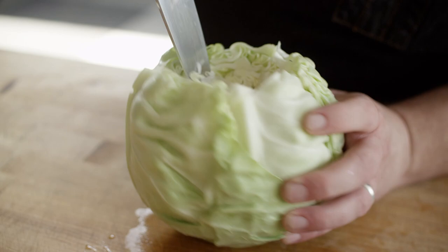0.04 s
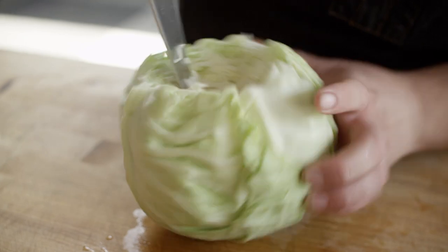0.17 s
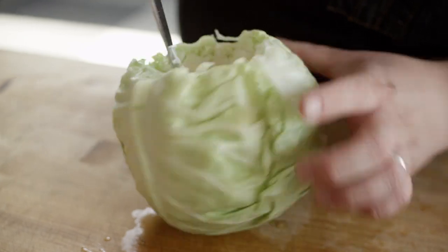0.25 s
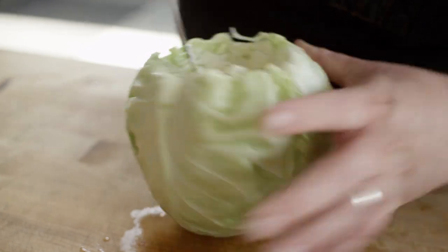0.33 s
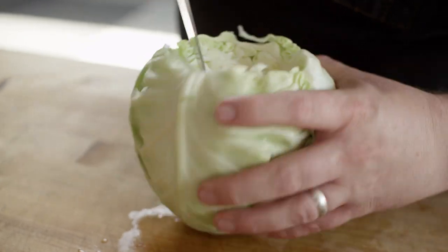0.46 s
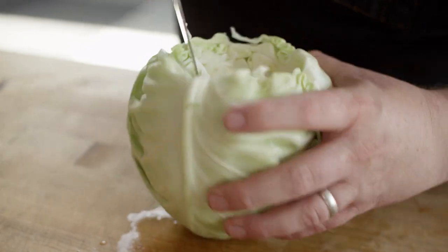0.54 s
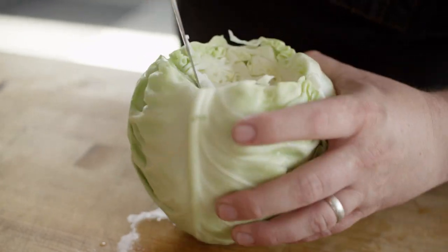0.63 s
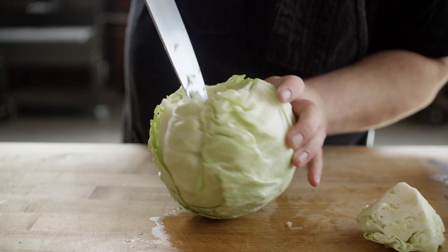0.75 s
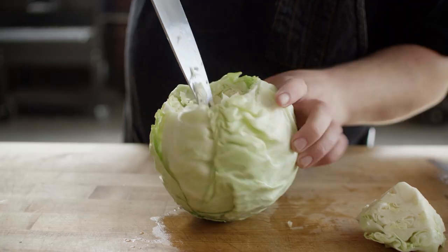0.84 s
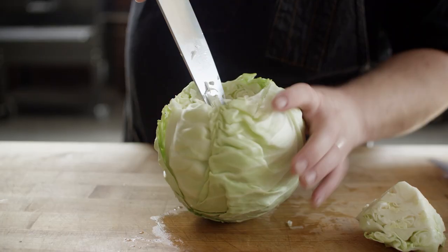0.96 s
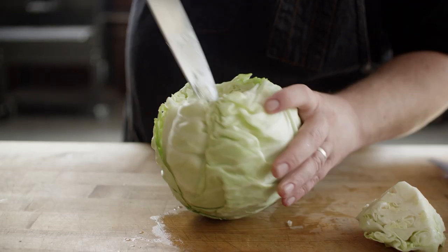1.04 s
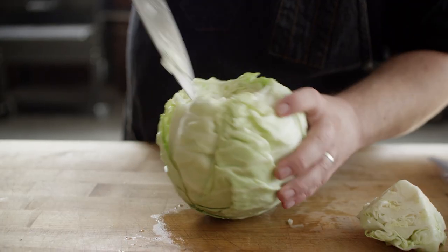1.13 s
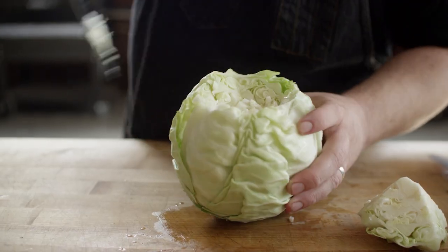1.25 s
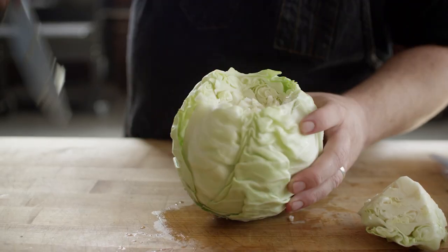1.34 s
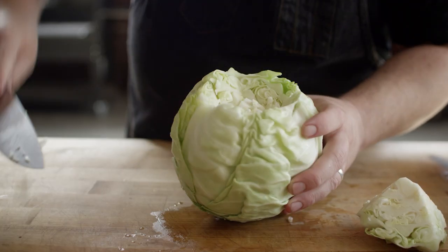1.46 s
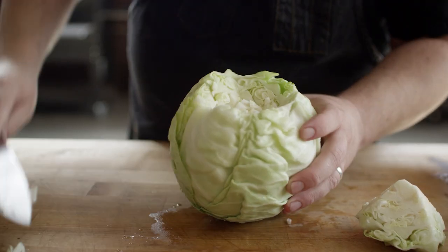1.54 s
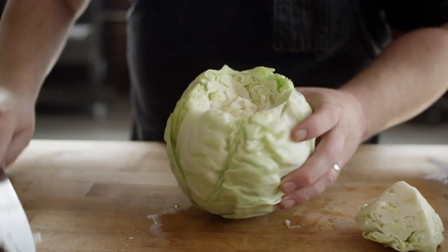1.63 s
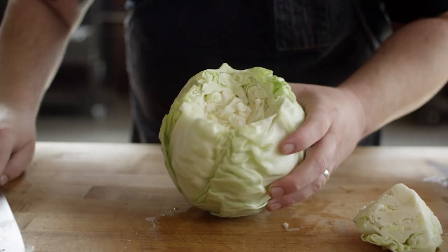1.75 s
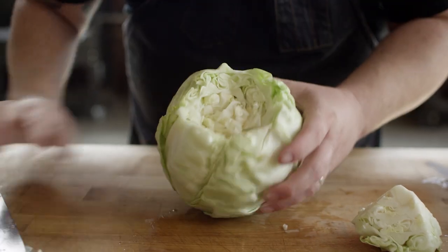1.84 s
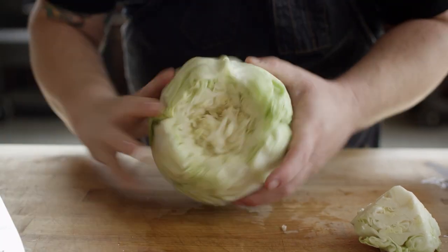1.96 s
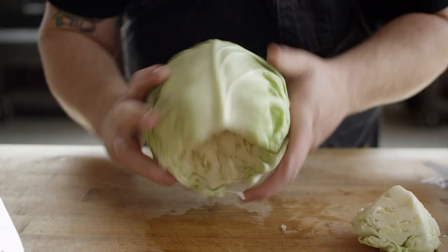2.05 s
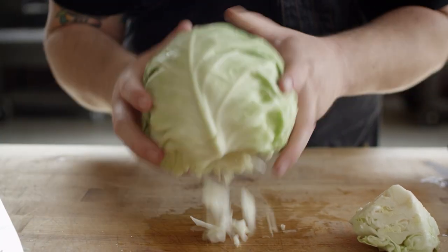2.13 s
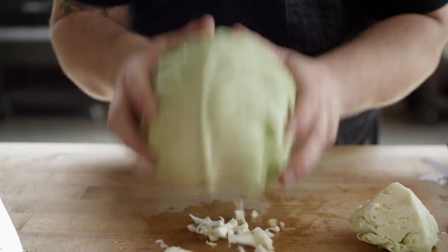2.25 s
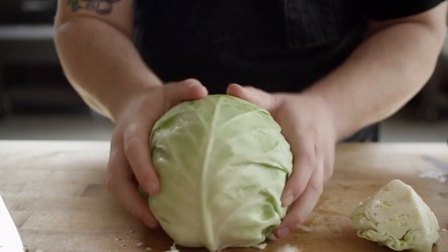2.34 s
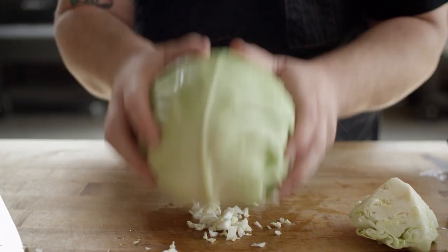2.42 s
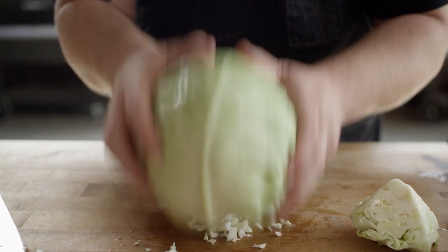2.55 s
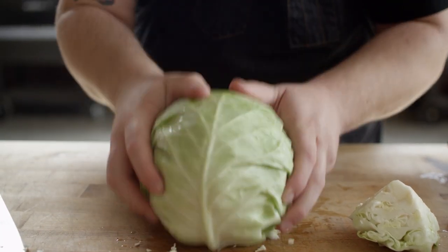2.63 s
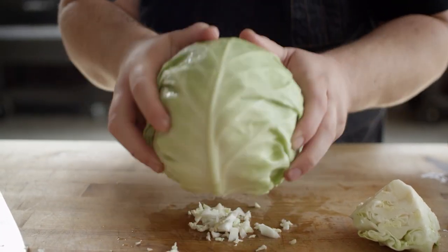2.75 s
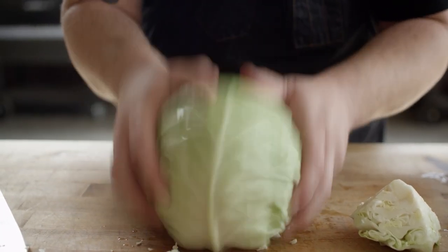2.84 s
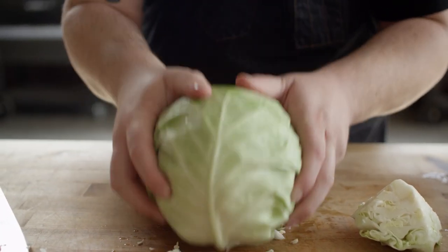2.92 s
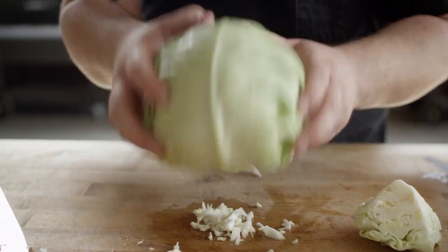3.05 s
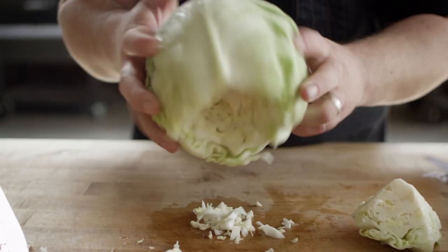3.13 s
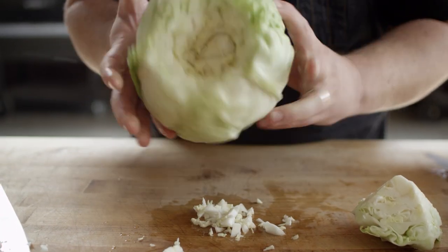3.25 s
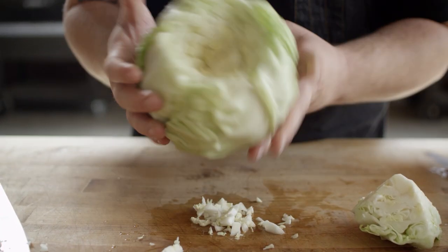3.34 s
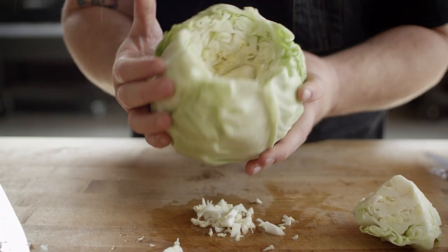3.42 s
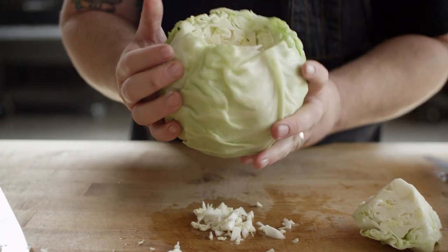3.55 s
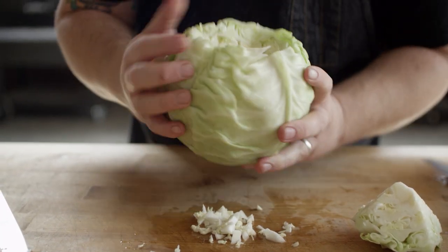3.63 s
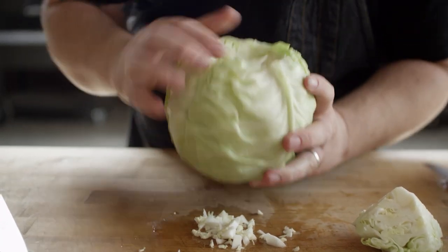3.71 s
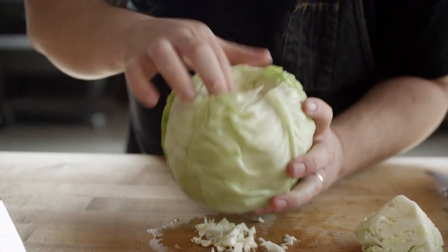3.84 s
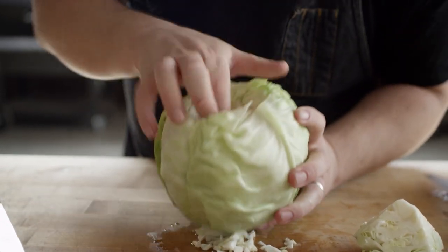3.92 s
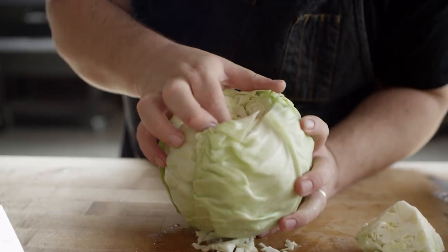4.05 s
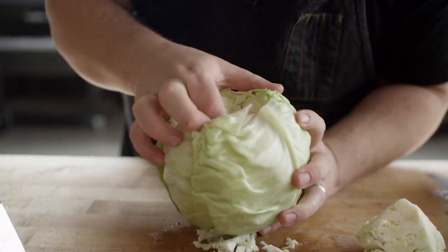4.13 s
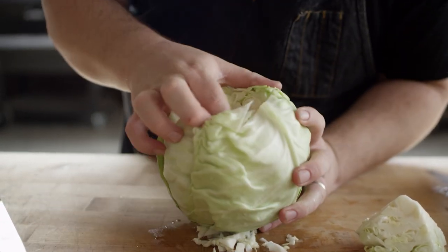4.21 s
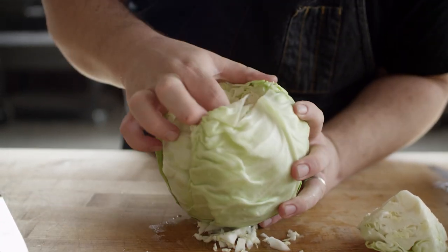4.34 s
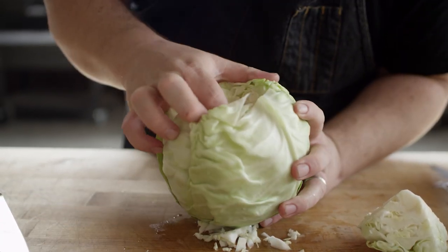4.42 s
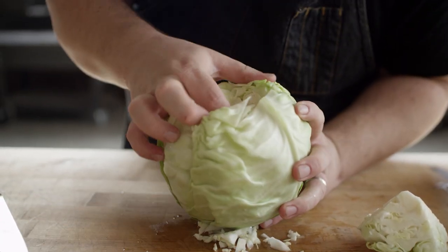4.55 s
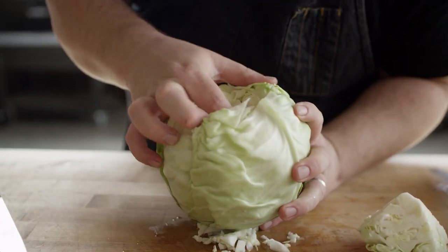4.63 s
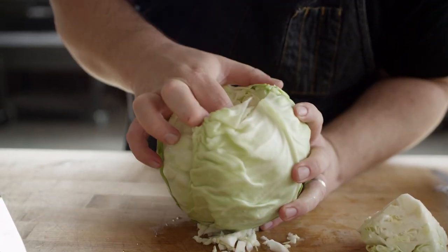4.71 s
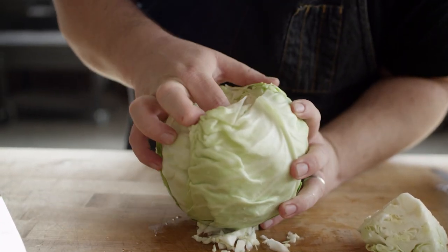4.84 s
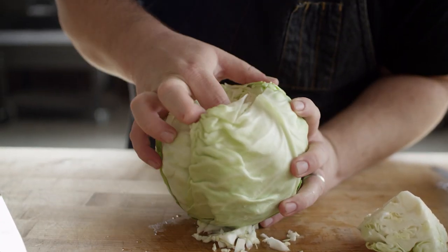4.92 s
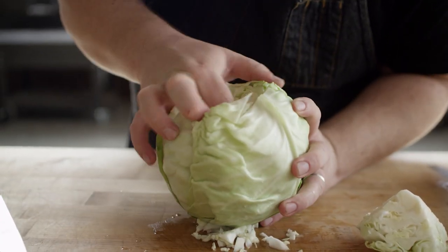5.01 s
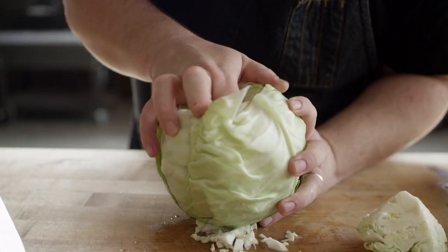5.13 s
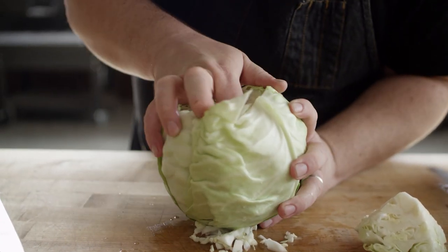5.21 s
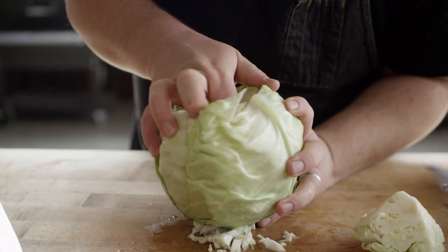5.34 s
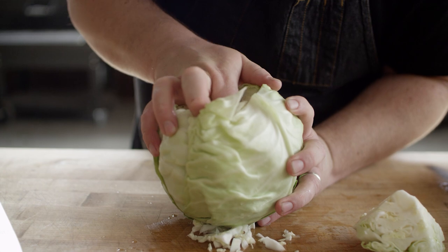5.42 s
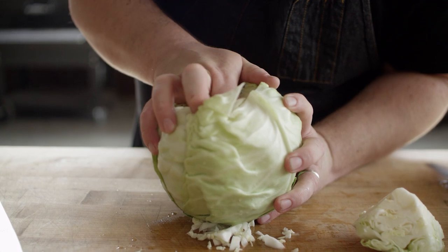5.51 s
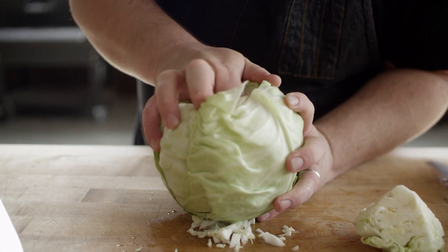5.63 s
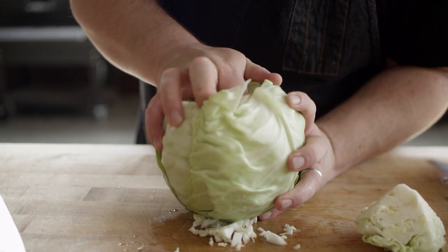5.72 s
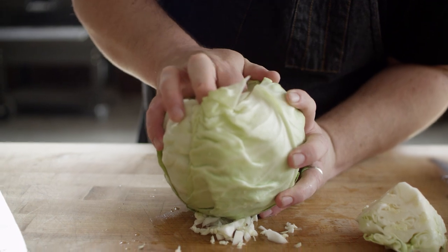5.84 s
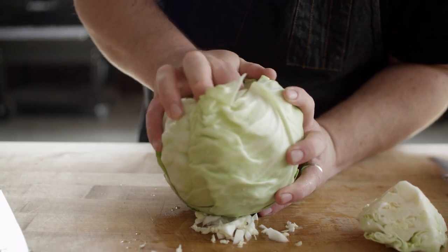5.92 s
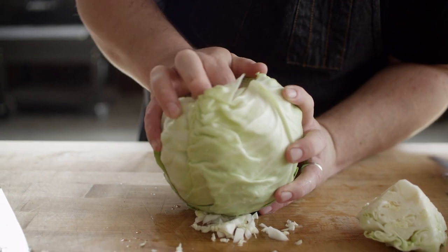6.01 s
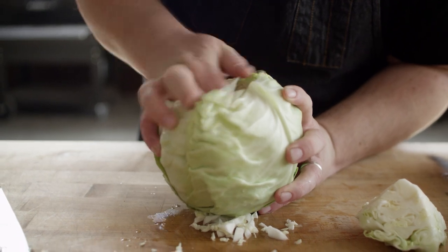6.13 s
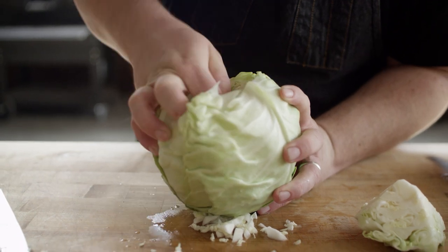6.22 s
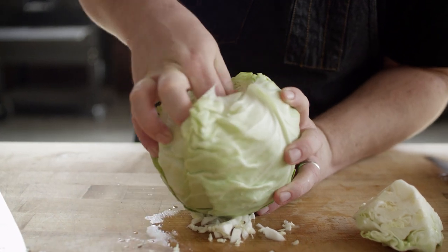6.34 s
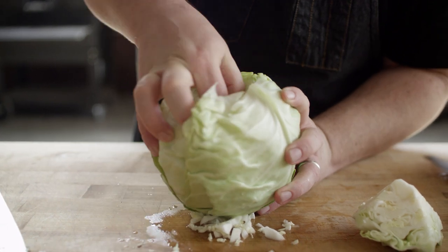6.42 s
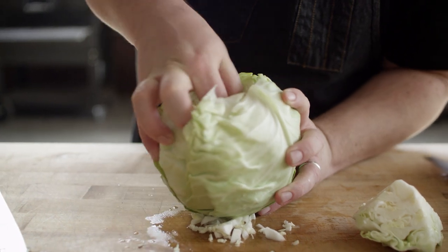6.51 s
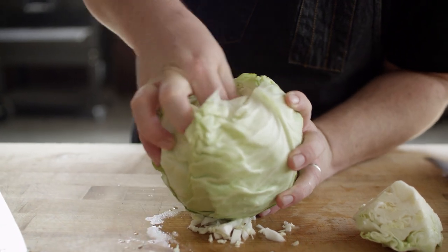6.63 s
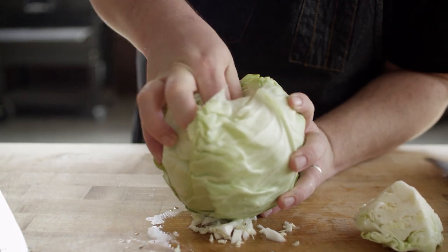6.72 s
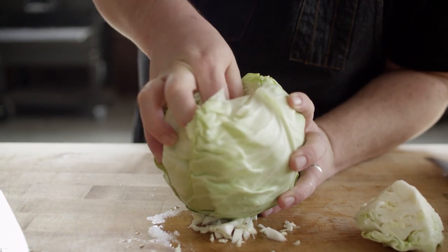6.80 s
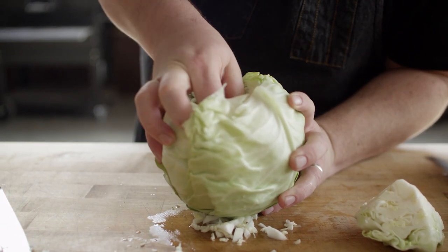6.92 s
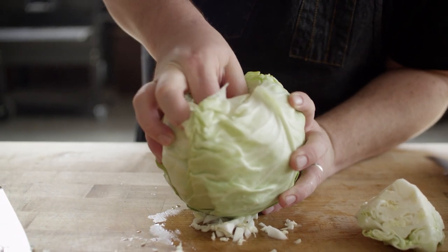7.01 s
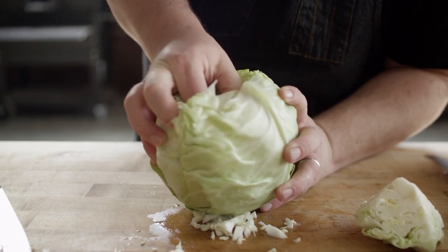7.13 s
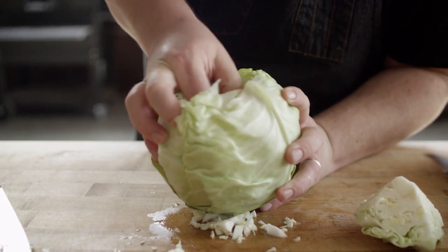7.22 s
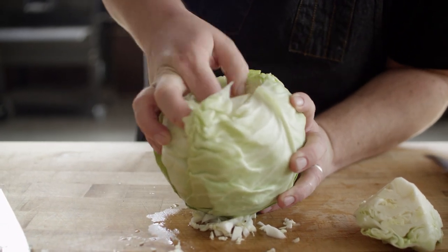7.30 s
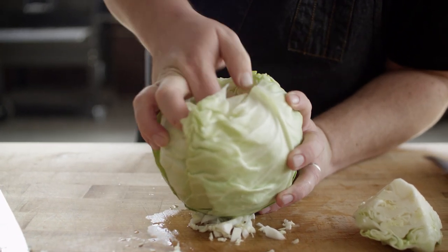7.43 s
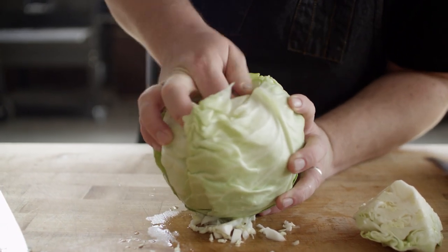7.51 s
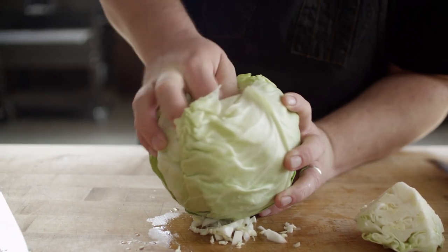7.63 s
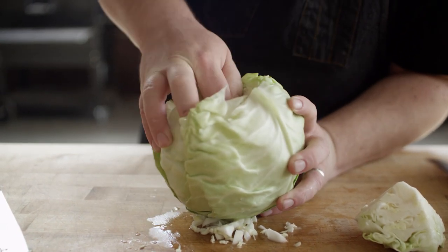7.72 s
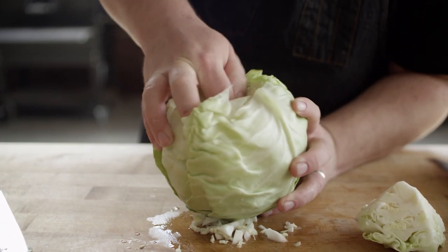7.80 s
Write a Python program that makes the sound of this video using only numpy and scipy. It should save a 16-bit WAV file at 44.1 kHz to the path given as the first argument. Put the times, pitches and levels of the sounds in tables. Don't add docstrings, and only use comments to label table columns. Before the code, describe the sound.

A close view in a room with a short, soft reverberation; a low cooler hum and faint street rumble lie underneath. From 0 to 1 s a knife works in a cabbage stalk: irregular crisp snaps, wet gritty crunches, faint steel tings and small board taps. At 1.1-1.6 s the blade slides out with a soft swish. Around 1.8-1.95 s it lands in a loud, fast clatter of handle and steel on wood. At 2.4, 2.65 and 2.9 s the heavy head thumps the board, deep and woody, with leaves and loose bits rattling densely until about 3.15 s. A quieter pause with light rubbing and tiny squeaks follows. From 4 s to the end fingers dig: sparse dry ticks, sharp rib snaps, strongest near 6.2 s, and waxy rubbing. Outside, a heavy vehicle's rumble and tyre whine swell from 4.5 s; its engine drone peaks near 6 s, then eases.

```python
import sys
import numpy as np
from scipy import signal
from scipy.io import wavfile

SR = 44100
rng = np.random.default_rng(int(sys.argv[2]) if len(sys.argv) > 2 else 0)


def persist_wave(psi):
    counts = np.round(np.clip(psi, -1, 1) * 32767).astype(np.int16)
    wavfile.write(sys.argv[1], SR, np.atleast_2d(counts).T)


def ratio_of_db(decibels):
    return 10 ** (np.asarray(decibels, float) / 20)


N = 346747

# start_s, peak_db, edge_db, flat_db
KNIFE_TOUCHES = [(1.801, -37, 11.5, -8), (1.823, -50, 16, -8), (1.8437, -16.5, -4, -20),
                 (1.8467, -12, -5, -18), (1.859, -16, -8, -20), (1.875, -12.5, -10, -2),
                 (1.878, -13.5, -3, -10), (1.885, -19, -12, 4), (1.903, -17.5, -9, -8),
                 (1.915, -21.5, -14, -15), (1.926, -23, -13, -15)]
# start_s, push_db
HEAD_KNOCKS = [
    (2.389, -16.5),
    (2.656, -16),
    (2.927, -17),
]
# pitch_hz, level_db, t60_s
TABLE_MODES = [(42, -6.5, 0.54), (85.6, 6, 0.052), (118, -10, 0.99), (194.3, -13, 0.43), (307, -4.5, 0.042),
               (363.4, -6, 0.052), (430, -6, 0.052), (567, -4.5, 0.041), (755, -5.5, 0.069),
               (904, -6, 0.042), (1238, -21, 0.091)]
# pitch_hz, level_db, t60_s
BLADE_MODES = [(3200, 4, 0.053), (4400, -10, 0.06), (5150, 1, 0.096), (6840, -17, 0.1), (9000, -13, 0.18),
               (10000, -24, 0.13), (12300, 2, .12), (13100, -8, .15)]


def unit(x):
    return x / np.sqrt(np.mean(x ** 2) + 1e-20)


def in_time(rows, outside=None):
    s, *columns = np.transpose(rows)
    return [np.interp(np.arange(N) / SR, s, c, outside, outside) for c in columns]


def band(x, low_hz, high_hz, order=2):
    edges_hz = [low_hz, min(high_hz, .45 * SR)]
    return signal.sosfilt(signal.butter(order, edges_hz, "band", fs=SR, output="sos"), x)


def drift(rate_hz):
    r = np.exp(-80 * np.pi * rate_hz / SR)
    slow = signal.lfilter([1], [1, -2 * r, r * r], rng.standard_normal(N // 40 + 2002))[2000:]
    return np.interp(np.arange(N) / 40, np.arange(len(slow)), unit(slow))


def ring(clicks, hz, t60_s):
    r, w = ratio_of_db(-60 / (t60_s * SR)), 2 * np.pi * hz / SR
    return signal.lfilter([0, np.sin(w)], [1, -2 * r * np.cos(w), r * r], clicks + 1e-18)


def strike(modes, times_s, blow_db, scatter_db, contact_hz):
    at, out = (np.asarray(times_s) * SR).astype(int), np.zeros(N)
    first, luck = at.min(), rng.standard_normal((len(at), len(modes)))
    ringing = out[first:at.max() + SR]
    for k, (hz, level_db, t60_s) in enumerate(modes):
        clicks = np.zeros(len(ringing))
        clicks[at - first] = ratio_of_db(blow_db + level_db + scatter_db * luck[:, k])
        ringing += (-1) ** k * ring(clicks, hz, np.clip(t60_s, .02, .7))
    soft = np.exp(-2 * np.pi * contact_hz / SR)
    return signal.lfilter([(1 - soft) ** 2], [1, -2 * soft, soft ** 2], out + 1e-18)


def grains(per_s, spread_db):
    sizes = ratio_of_db(spread_db * np.minimum(rng.exponential(1, N), 4)) * rng.choice([-1, 1], N)
    return unit(sizes * (rng.random(N) < per_s / SR))


def pressure(strokes):
    gain = np.zeros(N)
    for start_s, end_s, level_db in strokes:
        first = max(int(start_s * SR), 0)
        now = np.arange(first, min(int(end_s * SR), N)) / SR
        ramp_s = 0.00056 + 0.19 * abs(end_s - start_s)
        shape = np.clip(np.minimum(now - start_s, end_s - now) / ramp_s, 0, 1)
        gain[first:first + len(now)] += ratio_of_db(level_db) * shape
    return gain


def tone(hz, level_db, wobble_db):
    gain = np.sqrt(2) * ratio_of_db(level_db + wobble_db * drift(8.2))
    return gain * np.sin(2 * np.pi * np.cumsum(hz) / SR)


def kitchen(x):
    # low_hz, high_hz, t60_s
    decays = [(61, 106, 1), (221, 550, 0.93), (740, 1340, 0.85), (1500, 3170, 0.71), (2730, 6000, 0.5),
              (5600, 10500, 0.35)]
    t = np.arange(SR) / SR
    white = rng.standard_normal(SR) * np.clip((t - .006) / 0.0078, 0, 1)
    tail = sum(band(white, low_hz, high_hz) * ratio_of_db(-60 * t / t60_s) for low_hz, high_hz, t60_s in decays)
    return signal.fftconvolve(x, unit(tail) / np.sqrt(SR))[:N]


def hiss():
    return ratio_of_db(-76.0) * unit(band(rng.standard_normal(N), 3000, 19000, order=1))


def street():
    # start_s, level_db
    swell = [(0, -50), (.32, -54.5), (.8, -51.5), (1.4, -52.5), (1.79, -52.5), (3.35, -47), (3.6, -47.5),
             (4.0, -45.5), (4.4, -45), (4.55, -40), (4.9, -41.5), (5.2, -39), (5.45, -39.5), (5.8, -39),
             (6.6, -38.5), (7.1, -41), (7.5, -40), (7.86, -40.5)]
    # pitch_hz, density_db (per Hz)
    colour = [(15, -48), (25, -10), (107, -1.5), (147, -3.5), (253, -3.5), (286, -7.5), (316, -3),
              (557, -10.5), (1110, -14.5), (1350, -14), (2400, -26), (3400, -31.5), (4900, -35.5),
              (6700, -51), (9000, -63), (11700, -89), (19800, -120)]
    # level_db, share of the swell
    ranges = [(-46.5, 0.33), (-39.5, 1.067), (-51.5, 0.91)]
    # start_s, end_s, gain_db
    leans = [
        (4.49, 4.63, 1),
        (5.0, 5.75, -3),
        (6.45, 7.6, -6),
    ]
    passing_db = -40
    (swell_db,), together = in_time(swell), drift(5.3)
    white, edges_hz = rng.standard_normal((2, N)), 22 * 2 ** np.arange(0, 9.6, .5)
    table_hz, table_db = np.transpose(colour)
    layers = np.zeros((3, N))
    for k, (low_hz, high_hz) in enumerate(zip(edges_hz, edges_hz[1:])):
        level_db = np.interp(np.log(low_hz * high_hz) / 2, np.log(table_hz), table_db)
        gain = ratio_of_db(level_db + 0.48 * together + 1.0 * drift(6.2))
        layers[int(low_hz > 170) + int(low_hz > 800)] += gain * band(white[k % 2], low_hz, high_hz)
    layers[0] *= 1 + pressure(leans)
    return sum(ratio_of_db(level_db + share * (swell_db - passing_db)) * unit(layer)
               for (level_db, share), layer in zip(ranges, layers))


def whine():
    # start_s, end_s, level_db
    swells = [
        (4.4, 5.3, -68),
        (5.2, 7.4, -62),
        (7.2, 7.86, -67.5),
    ]
    return pressure(swells) * ratio_of_db(1.8 * drift(3.7)) * unit(band(rng.standard_normal(N), 1880, 2560))


def motors():
    # start_s, level_db
    load = [(3.6, -56.5), (4.3, -58.5), (4.5, -49), (4.8, -52.5), (5.8, -46.5), (6.0, -39.5), (6.9, -44.5),
            (7.1, -50.5), (7.87, -54)]
    # start_s, pitch_hz, level_db
    cooler = [(0, 128, -51.5), (.7, 125.3, -59.5), (1.7, 119.7, -53), (3.5, 118, -60.5), (5.7, 122, -50),
              (6.6, 121.4, -55.5), (6.95, 107.3, -50), (7.2, 107.1, -48), (7.86, 107.5, -45)]
    # start_s, end_s, level_db
    far_call = (4.1, 4.45, -56.5)
    load_db, = in_time(load, -120)
    pitch_hz = 284.3 * (1 + 0.0018 * drift(1.46))
    drone = tone(pitch_hz, load_db, 1.0) + pressure([far_call]) * tone(2 * pitch_hz, 0, 1.0)
    drone += tone(2 * pitch_hz, load_db - 8.5, 2.5)
    drone += tone(3 * pitch_hz, load_db - 24, 2.5)
    hum_hz, hum_db = in_time(cooler)
    return drone + tone(hum_hz * (1 + 0.0194 * drift(5.62)), hum_db, 3.2)


def rubbing():
    # start_s, level_db
    grip_rows = [(0, -60), (1.05, -71), (1.8, -64.5), (3.65, -68), (4.35, -83), (4.55, -55), (5.3, -53),
                 (5.5, -75), (6.3, -56), (7.86, -60.5)]
    # start_s, end_s, crunch_db
    bite_rows = [(0, 0.019, -47), (0.03, .055, -66), (.135, .165, -67), (0.068, 0.131, -58),
                 (0.162, 0.204, -61), (0.43, 0.492, -57), (0.514, 0.56, -60), (0.56, 0.624, -56),
                 (0.715, 0.793, -54), (0.832, 0.918, -60), (0.929, 1.01, -57.5), (2.058, 2.078, -62),
                 (2.067, 2.22, -64.5), (3.185, 3.38, -61), (3.692, 3.76, -70), (4.007, 4.043, -63),
                 (4.08, 4.13, -64), (4.143, 4.2, -56.5), (4.767, 4.8, -59), (5.035, 5.181, -83),
                 (6.017, 6.064, -62), (6.207, 6.234, -47.5), (6.424, 6.526, -67), (6.59, 6.653, -62),
                 (6.697, 6.778, -68), (6.88, 6.934, -63), (7.06, 7.133, -59), (7.505, 7.543, -53), ]
    # start_s, end_s, rub_db
    glide_rows = [(.64, .716, -69), (4.385, 4.7, -70), (4.83, 4.95, -80), (6.44, 6.52, -65),
                  (6.72, 6.8, -66), (7.09, 7.79, -67)]
    grip, bites, glides = ratio_of_db(in_time(grip_rows)[0]), pressure(bite_rows), pressure(glide_rows)
    bites_fine = pressure([(start_s, end_s, db - 5.5 - 63 * (end_s - start_s))
                           for start_s, end_s, db in bite_rows])
    crunch_gain = ratio_of_db(-6.5) * grip + bites + ratio_of_db(-10) * glides
    fine_gain = ratio_of_db(-17.5) * grip + bites_fine

    clumps = ratio_of_db(2.4 * drift(47))
    bursts, dealt = grains(3500, 1.1) * clumps, rng.integers(0, 8, N)
    crunch = np.zeros(N)
    for k, hz in enumerate(np.geomspace(2000, 10000, 8)):
        cells = ring(bursts * (dealt == k), hz, 8.8 / hz)
        crunch += ratio_of_db(3.0 * drift(21)) * cells * (hz / 3000) ** -.3
    dense = grains(11000, 5.2)
    fine = band(dense * clumps ** 1.2, 10000, 16000)
    smooth = band(dense * ratio_of_db(0.79 * drift(25)), 11000, 15500)
    return crunch_gain * unit(crunch) + fine_gain * unit(fine) + glides * unit(smooth)


def swish():
    # start_s, end_s, level_db, low_hz, high_hz
    sweeps = [
        (1.07, 1.357, -62, 1400, 3800),
        (1.1, 1.296, -73, 3500, 7740),
        (1.28, 1.58, -67, 2000, 7000),
        (1.36, 1.53, -71, 6000, 12000),
    ]
    white = rng.standard_normal(N)
    air = sum(pressure([(start_s, end_s, db)]) * unit(band(white, low_hz, high_hz))
              for start_s, end_s, db, low_hz, high_hz in sweeps)
    song = sum(ratio_of_db(level_db / 2) * unit(ring(white, hz, t60_s)) for hz, level_db, t60_s in BLADE_MODES[:6])
    return air + pressure([(1.13, 1.3, -78)]) * song


def blade():
    # start_s, flick_db
    flicks = [(.02, -65), (.085, -69), (.119, -65), (.265, -68), (0.337, -73), (0.599, -64), (0.855, -57),
              (.95, -64), (1.167, -70), (1.213, -70)]
    # start_s, end_s, start_hz, end_hz, level_db
    squeaks = [(1.555, 1.6, 12800, 15700, -82), (1.605, 1.648, 14300, 15700, -79),
               (1.715, 1.81, 15200, 15050, -78), (.35, .405, 13000, 12800, -78),
               (3.585, 3.635, 11600, 15800, -78), (3.6, 3.67, 12200, 15900, -78),
               (3.72, 3.8, 11200, 10900, -83), (3.89, 3.99, 14200, 14700, -80),
               (3.91, 3.97, 12500, 12900, -81), (4.06, 4.145, 15800, 14000, -78),
               (1.63, 1.65, 13300, 14600, -84), (1.68, 1.7, 15200, 15800, -82),
               (1.7, 1.745, 14000, 14400, -83), (1.69, 1.74, 10500, 10700, -84),
               (1.68, 1.8, 12600, 13000, -84)]
    s, flick_db = np.transpose(flicks)
    out = strike(BLADE_MODES, s, flick_db, 2.9, 12000)
    for start_s, end_s, start_hz, end_hz, level_db in squeaks:
        done = np.linspace(0, 1, int((end_s - start_s) * SR))
        turns = np.cumsum(start_hz + (end_hz - start_hz) * done) / SR
        swell = np.sqrt(2 * np.sin(np.pi * done).clip(0))
        out[int(start_s * SR):][:len(done)] += ratio_of_db(level_db) * swell * np.sin(2 * np.pi * turns)
    return out


def snaps(rows, trim_db, t60_s, bright_hz, body_hz):
    out, t = np.zeros(N + 2048), np.arange(1024) / SR
    shape = ratio_of_db(-60 * t / t60_s) * (t / 0.0011).clip(0, 1) ** 2
    puffs = rng.standard_normal((len(rows), len(t))) * shape
    pitch_luck = rng.uniform(-1, 1, len(rows))
    for (s, peak_db, body_db, *pop_hz), puff, luck in zip(rows, puffs, pitch_luck):
        hz = bright_hz * 1.28 ** luck * ratio_of_db(-.2 * (peak_db + 35.0))
        pop = pop_hz[0] if pop_hz else body_hz * 0.81 ** -luck
        bright, dull = band(puff, hz / 2, hz * 2), band(puff, pop / 1.15, pop * 1.02, order=1)
        snap = bright / np.abs(bright).max() + ratio_of_db(body_db + 4.0) * dull / np.abs(dull).max()
        out[int(s * SR):][:len(t)] += ratio_of_db(peak_db + trim_db) * snap
    return out[:N]


def digging():
    # start_s, peak_db, pop_db, pop_hz (a few only)
    ribs = [(3.434, -44, -3.5), (4.154, -38, -9), (4.1904, -49, -3), (4.2074, -35, -3.5, 2600),
            (4.6109, -43, -7), (4.7236, -35, -20), (5, -43, -2, 3000), (4.785, -38, -1),
            (4.8225, -38.5, -15), (5.036, -39.5, -12), (5.0644, -47, -2), (5.1267, -43, 0),
            (5.2645, -35, 2, 6000), (5.3286, -35.5, -17), (5.5174, -41.5, -11), (5.7094, -37.5, -17),
            (5.7937, -42, -33), (5.8217, -39, -12), (5.877, -40, -17), (6.1828, -32, -9), (6.1955, -30, -4),
            (6.203, -29.5, -13), (6.2646, -40, -3.5), (6.341, -44, 0), (6.8059, -39, -9), (6.8268, -38, -7),
            (6.9701, -42, -7), (7.0389, -44, -3), (7.3696, -36.5, -7), (7.6001, -40, -6)]
    # start_s, peak_db
    veins = [(0.0194, -41), (0.0444, -51), (0.1944, -56), (0.2328, -56), (0.2872, -60), (0.3081, -57),
             (0.3894, -58), (0.409, -44), (0.4144, -49), (0.471, -42), (0.509, -42), (0.8364, -49),
             (0.8833, -54), (3.6778, -58), (3.74, -58), (3.8054, -53), (3.8918, -54), (3.9664, -48),
             (3.9754, -52), (3.9956, -54), (4.0136, -56), (4.0204, -54), (4.0315, -47), (4.0484, -61),
             (4.059, -56), (4.0791, -55), (4.0901, -46), (4.1134, -53), (4.1213, -50), (4.1424, -53),
             (4.1486, -45), (4.1674, -47), (4.1794, -50), (4.2284, -54), (4.5142, -55), (4.6349, -39.5),
             (4.9208, -47), (5.5808, -54), (5.6167, -46), (5.9066, -55), (6.0273, -47), (6.1089, -50),
             (6.4399, -47), (6.484, -42), (6.594, -52), (6.7277, -44), (6.8699, -52), (6.894, -55),
             (7.0738, -44), (7.4755, -52), (7.5124, -46)]
    ticks = [(s, db, -9) for s, db in veins]
    return snaps(ribs, -1.6, 0.0075, 10300, 3800) + snaps(ticks, -1.6, 0.0044, 7800, 4200)


def cutting():
    # start_s, peak_db, pop_db, pop_hz
    ribs = [(0.019, -29.5, 0.5, 2040), (0.0834, -37, -8, 2020), (0.1086, -35.5, -14, 4440),
            (0.1186, -37, -7, 2680), (0.1772, -36, 3, 6300), (0.2644, -49, -14, 2040),
            (0.3356, -41, -11, 5600), (0.4454, -47, -10, 2200), (0.4574, -47, -16, 2440),
            (0.5257, -33, -17, 1500), (0.5504, -45, -1, 2050), (0.5771, -48, 1, 2180),
            (0.597, -38, -6, 3730), (0.612, -46, -11, 2010), (0.7108, -46, -10, 3300),
            (0.7293, -43, -20, 2690), (0.7659, -34, 6.5, 2260), (0.7847, -43, -16, 2600),
            (0.853, -48, 5, 3600), (0.9323, -41, -16, 2390), (0.949, -42, 1, 2290), (0.9842, -49, 5, 4160),
            (1.0231, -61, 14.5, 2400), (1.166, -61, 17, 3080)]
    return snaps(ribs, -3.0, 0.0033, 6200, 1400)


def knife_flat():
    # pitch_hz, level_db, t60_s
    modes = [(2690, -11.5, 0.21), (6200, -24, .12), (7250, -41, .1), (5500, -34, .08)]
    s, peak_db, edge_db, flat_db = np.transpose(KNIFE_TOUCHES)
    resting_s = np.clip(np.arange(N) / SR - 1.925, 0, 1)
    return strike(modes, s, peak_db + flat_db - 9.5, 1.6, 7000) * ratio_of_db(-60 * resting_s / .04)


def knife():
    # pitch_hz, level_db, t60_s
    body_modes = [(191, -5, 0.34), (324, -13, 0.1), (398, -0.5, 0.023), (556, -2, 0.056), (592, -7.5, 0.2),
                  (624, -3, 0.083), (676, -11, 0.069), (757, -4, 0.16), (815, 0.5, 0.088),
                  (928.5, -1.5, 0.12), (990, -17.5, .12), (1380, -17, 0.17), (1494, 2, 0.077),
                  (1910, -24, 0.092), (1670, -0.5, 0.038), (1890, 5.5, 0.018), (2040, -11, 0.063),
                  (2200, -34, .08)]
    # pitch_hz, level_db, t60_s
    edge_modes = [(3430, -21, .05), (3150, -25, .07), (3750, -25, .05), (4370, -29, .04), (5230, -29, .12),
                  (6000, -31, .05), (7000, -34, .04), (12200, -33, .086)]
    s, peak_db, edge_db, flat_db = np.transpose(KNIFE_TOUCHES)
    body = strike(body_modes, s, peak_db - 12.0, 6.2, 3900)
    body += strike(edge_modes, s, peak_db + edge_db - 7.0, 2.2, 9000)
    touches = np.zeros((3, N))
    touches[:, (s * SR).astype(int)] = ratio_of_db([peak_db - 13.5, peak_db + edge_db - 27, peak_db - 30.5])
    thud, edge, grit = (signal.lfilter([1], [1, -ratio_of_db(-60 / (t60_s * SR))], row + 1e-18)
                        for row, t60_s in zip(touches, (.07, .03, .12)))
    white = rng.standard_normal(N)
    crack = band(thud * unit(band(white, 720, 1640)), 580, 3300)
    crack += edge * unit(band(white, 3200, 5800, order=1))
    crack += grit * unit(band(white, 2340, 4020))
    return body + crack


def rattles():
    # start_s, peak_db, board_db, rise_s, t60_s
    jolts = [(2.3332, -41.5, -22, 0.0024, 0.043), (2.3863, -12, -19, 0.003, 0.039),
             (2.415, -26.5, 12.5, .001, 0.045), (2.4283, -17, -7.5, 0.0035, 0.088),
             (2.438, -25.5, 11, .003, 0.063), (2.4586, -12, -9.5, 0.0025, 0.063),
             (2.4771, -25, -4, 0.0046, 0.074), (2.5022, -22, -6, 0.0039, 0.075),
             (2.515, -33, -4, 0.0037, 0.044), (2.5559, -19, -27, 0.0058, 0.075),
             (2.5777, -17.5, -13, 0.0052, 0.051), (2.6, -37, -10, .004, 0.06),
             (2.629, -35, -7, .004, 0.079), (2.6547, -15, -25, 0.0029, 0.039), (2.673, -28, -3, .005, 0.08),
             (2.697, -13, -19.5, 0.0053, 0.074), (2.7249, -10.5, -24, 0.0044, 0.063),
             (2.743, -28.5, 7, 0.0054, .07), (2.7672, -23.5, -7, .003, 0.066),
             (2.784, -31, -3, 0.0044, 0.048), (2.8171, -24, -15, 0.0014, 0.058),
             (2.83, -32, -19, 0.0035, 0.039), (2.866, -29, -4, .001, 0.044),
             (2.872, -28.5, -3.5, .003, 0.053), (2.926, -17.5, -23, 0.0027, 0.046),
             (2.9417, -25, -2, 0.0038, 0.073), (2.9645, -21.5, -27, .002, 0.073),
             (2.981, -29, 9, .004, .07), (2.9933, -13, -17, 0.00084, 0.046),
             (3.004, -22.5, -6, 0.0042, 0.052), (3.011, -19.5, -7, 0.0032, 0.061),
             (3.04, -25, -15.5, 0.0033, 0.084), (3.0561, -29, -1.5, .003, 0.043),
             (3.087, -26, -15, 0.0033, 0.07), (3.103, -35, -15, .004, 0.052),
             (3.1329, -28.5, -5, .001, 0.046), (3.1423, -29.5, -10, .003, 0.048)]
    # pitch_hz, width_hz, level_db
    leaf_body = [(1500, 810, 4), (1940, 506, 4.5), (2600, 636, 0.5), (3250, 1280, -0.5),
                 (4700, 3460, -10.5)]
    rows, landings_s = np.array(jolts), np.transpose(HEAD_KNOCKS)[0]
    body, spray, t = np.zeros(N), np.zeros(N), np.arange(8192) / SR
    for s, peak_db, board_db, rise_s, t60_s in rows:
        landing = np.abs(landings_s - s).min() < .01
        treble_db = -5 if landing else -10
        treble_db -= 2 * max(board_db + 6.5, 0)
        rise_s = np.clip(rise_s, .0003, .012)
        decay = ratio_of_db(peak_db - 4.0 - 60 * t / np.clip(t60_s, .01, .2))
        shape = decay * (1 - np.exp(-t / rise_s)) ** 4 * 1.31
        first = int((s - 1.9 * rise_s) * SR)
        body[first:][:len(t)] += shape
        spray[first:][:len(t)] += shape * ratio_of_db(treble_db - 60 * t / 0.13)
    grain = grains(6000, 3.2) * ratio_of_db(2.3 * drift(130))
    leaf = sum(ratio_of_db(level_db) * (-1) ** k * unit(ring(body * grain, hz, 1.38 / width_hz))
               for k, (hz, width_hz, level_db) in enumerate(leaf_body))
    leaf = unit(leaf) * np.sqrt(np.mean(body ** 2))
    taps = strike(TABLE_MODES[3:], rows[:, 0], rows[:, 1] + rows[:, 2] - 3, 6.44, 1060)
    return leaf + spray * unit(band(grain, 2800, 16300)) + taps


def knocks():
    # start_s, tap_db
    rock_taps = [(0.019, -44.5), (0.551, -54), (.70, -47), (0.766, -38), (0.949, -54), (2.235, -40)]
    s, push_db = np.transpose(HEAD_KNOCKS)
    deep = sum(strike([mode], s + 0.001, push_db - 2.5, 0.45, 330) for mode in TABLE_MODES[:3])
    rocks = strike(TABLE_MODES[2:], *np.transpose(rock_taps), 4.6, 2200)
    return strike(TABLE_MODES[3:], s - .002, push_db - .6, 0.66, 980) - deep + rocks


def scene():
    board = knife() + knocks() + rattles()
    leaves = blade() + swish() + cutting() + digging()
    room = kitchen(ratio_of_db(-13.5) * board + ratio_of_db(-17.5) * leaves)
    background = street() + whine() + motors() + hiss()
    return (board + knife_flat() + leaves + rubbing() + room + background)[None]


def band_limit(x):
    return signal.sosfilt(signal.butter(12, 16660, fs=SR, output="sos"), x)


def record(dry):
    low_cut = signal.butter(6, 36, "high", fs=SR, output="sos")
    top_cut = signal.ellip(8, .5, 32, 15780, fs=SR, output="sos")
    mix = signal.sosfilt(top_cut, signal.sosfilt(low_cut, dry))
    return band_limit(mix)


dry = scene()
out = record(dry)
persist_wave(out)
```